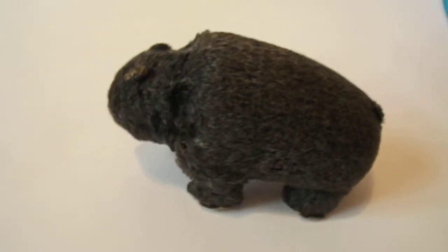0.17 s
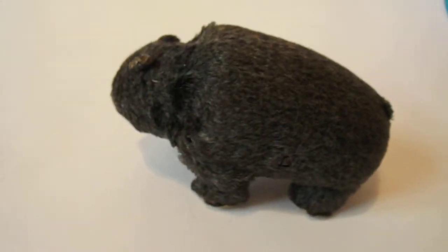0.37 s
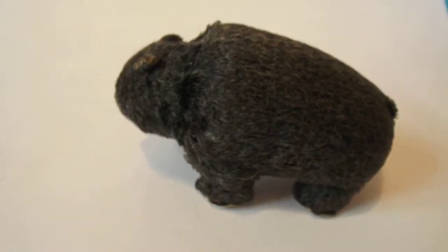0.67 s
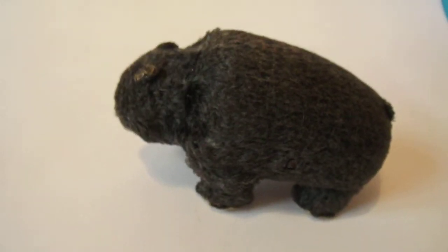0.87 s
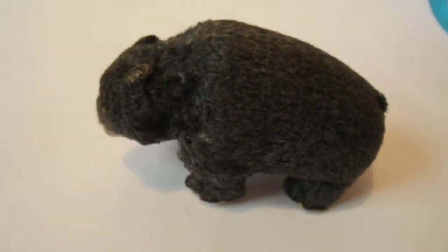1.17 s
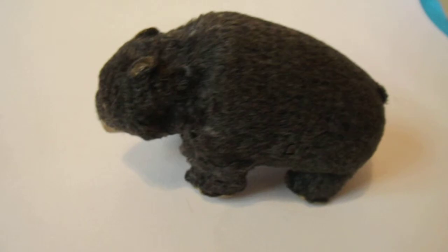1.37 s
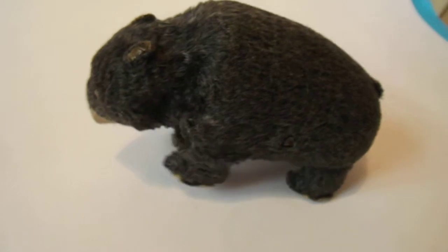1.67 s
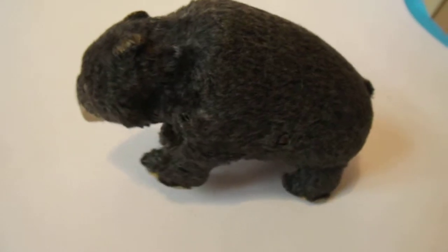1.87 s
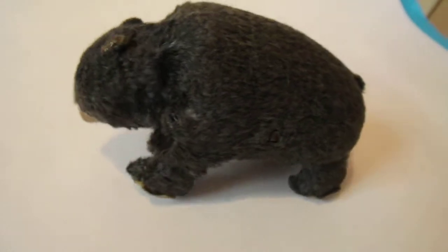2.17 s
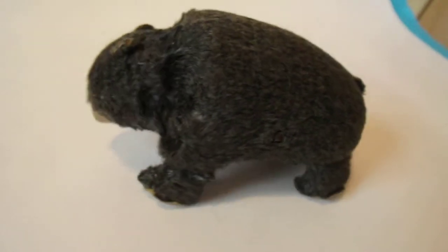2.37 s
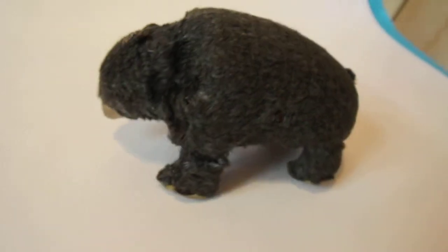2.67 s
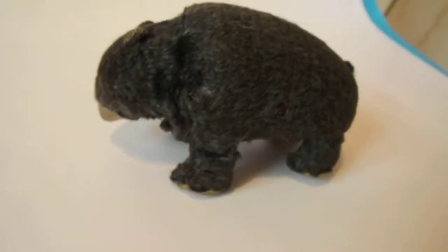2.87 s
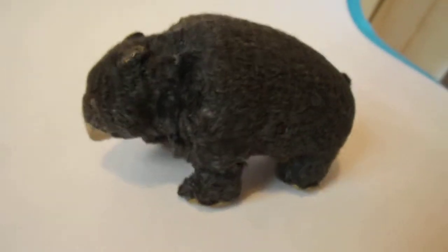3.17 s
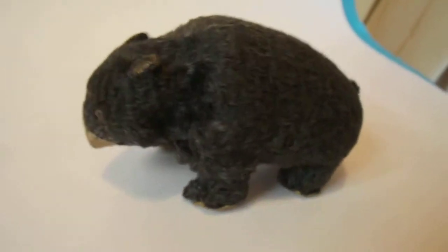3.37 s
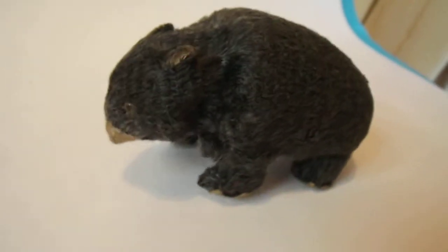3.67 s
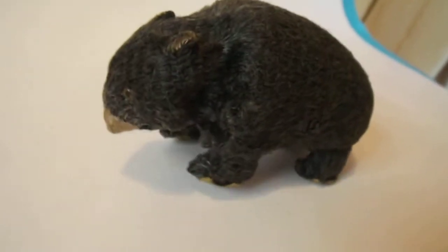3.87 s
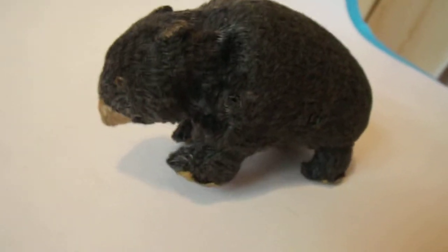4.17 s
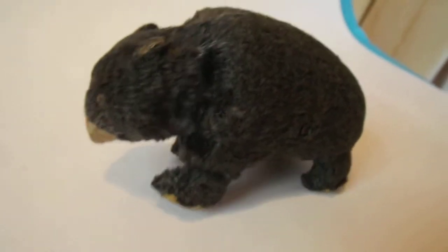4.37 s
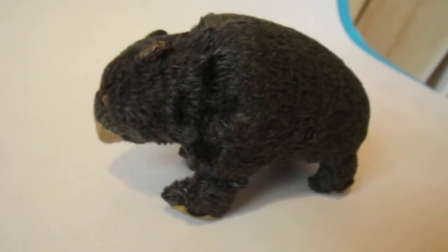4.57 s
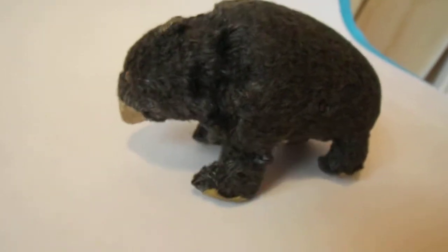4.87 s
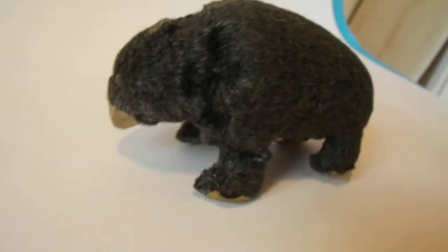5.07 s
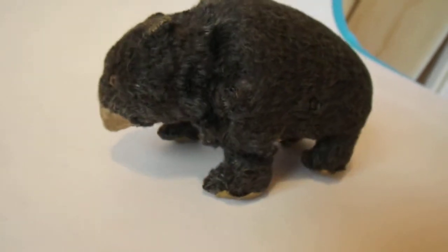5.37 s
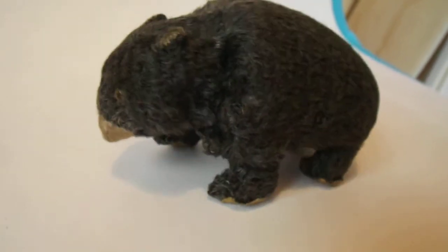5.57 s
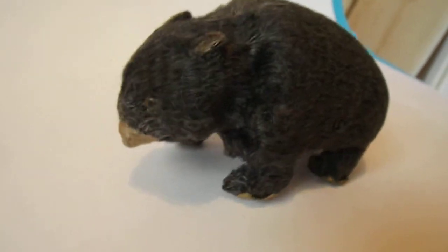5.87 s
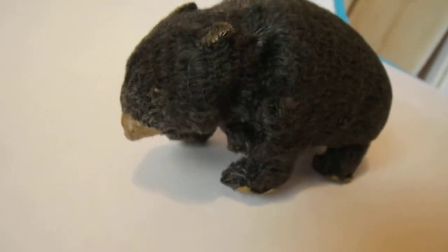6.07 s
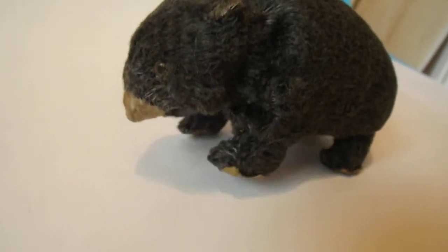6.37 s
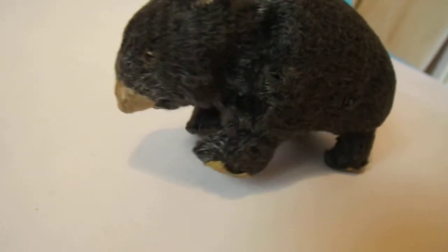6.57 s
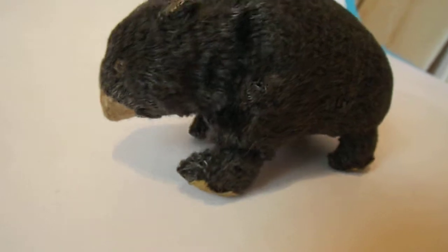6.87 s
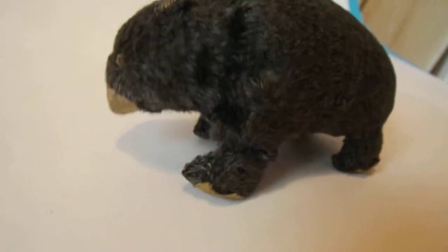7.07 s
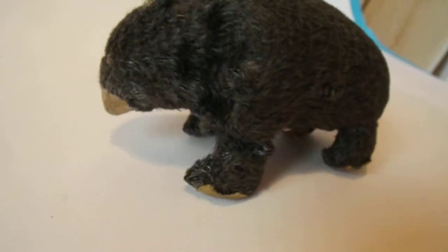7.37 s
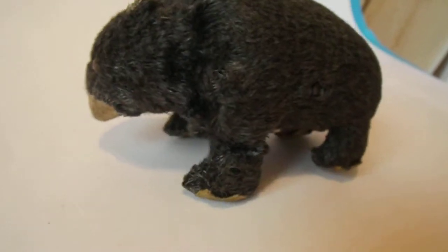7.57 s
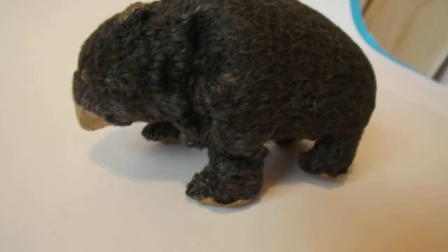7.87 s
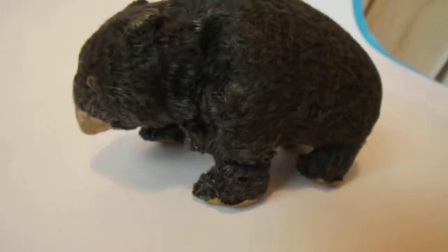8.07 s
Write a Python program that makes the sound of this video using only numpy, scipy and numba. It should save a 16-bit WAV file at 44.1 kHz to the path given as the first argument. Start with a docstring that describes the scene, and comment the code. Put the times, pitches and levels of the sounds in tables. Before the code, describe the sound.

A bright, rattling clockwork whir runs from the start for about eight seconds, close to a small microphone: a plush-covered tin bear walking on a table. Dense, tiny gear knocks ring the metal body with a high, hissy tone, wavering and gradually slowing a little. The whir sags briefly as a leg loads the mechanism at about 1.4 seconds, more deeply at 3.6 and most deeply at 5.9, recovering each time. Sharper gear ticks stand out around 0.5, 2.8, 4, 5.3, 6.9 and 7.2 seconds. The padded feet knock and scuff softly on the table at about 1.2 and 1.6 seconds, more faintly at 3.2, and barely at 5.4 and 6.8. Beneath the whir lie a very faint hum from the mechanism and the low, steady rumble of a quiet room.

```python
"""A bright, rattling clockwork whir: a plush-covered tin bear walks over a table top, close to a small
microphone. Its spring drives a gear train and a fast governor shaft: dense tooth knocks ring the
tin case, the shaft hums, and the whir sags and slows when a leg loads the train. The feet knock and
scuff softly on the table; behind them lies the low rumble of a quiet room."""
import sys
import numpy as np
from scipy import signal
from scipy.fft import rfft, irfft
from scipy.io import wavfile
from scipy.ndimage import uniform_filter1d
from numba import njit

SR = 44100
rng = np.random.default_rng(int(sys.argv[2]) if len(sys.argv) > 2 else 0)


def log_audio(samples):
    """Write samples as a 16-bit WAV file to the path given in sys.argv[1]."""
    # one column per channel
    frames = np.atleast_2d(samples).T
    # limit to full scale, then quantise
    limited = np.clip(frames, -1, 1)
    pcm = np.round(limited * 32767).astype(np.int16)
    wavfile.write(sys.argv[1], SR, pcm)


N = 363031


def clockwork():
    """The spring-driven train shakes case and table; returns the case's whir and the low hums."""
    # governor speed, slowing as the spring unwinds and whenever a leg loads it: t/s, turns/Hz
    governor = [(0.0, 145.5), (.2, 145.3), (.28, 136.8), (0.44, 132.2), (.52, 148.3), (0.62, 157.2),
                (.8, 147.6), (1.1, 145.7), (1.4, 122), (1.63, 127.7), (1.9, 125.7), (2.18, 139.4),
                (2.5, 119.6), (2.7, 129.8), (3.0, 118.8), (3.3, 132.8), (3.58, 102.4), (3.85, 127.7),
                (4.1, 121), (4.4, 137.4), (4.56, 129.1), (4.72, 110), (5.41, 114.5), (5.64, 128.4),
                (5.94, 96.5), (6.3, 122.6), (6.55, 115.8), (6.9, 132.6), (7.03, 114), (7.43, 101.4),
                (8.23, 102)]
    # whir in the plates while the train runs free: t/s, level/dB
    free_whir = [(0, -27.5), (.44, -27.5), (.5, -25), (.92, -27), (1.05, -27), (1.2, -29), (1.65, -27),
                 (1.85, -29.5), (2.2, -26), (2.42, -28.5), (2.62, -26.5), (3.3, -28.5), (4.1, -29.5),
                 (4.38, -27.5), (4.5, -27), (4.66, -30), (5.62, -28), (6.35, -28), (6.46, -30.5),
                 (6.6, -29), (6.9, -27.5), (7.05, -31), (8.23, -28.5)]
    # a leg nearly stalls the train: deepest t/s, sag/dB, sinking/s, recovering/s
    stalls = [(1.4, -6, 0.2, 0.14), (3.585, -10, 0.25, 0.23), (5.94, -14.5, 0.28, 0.3)]
    free_db, stall_db = curve(free_whir), ramps(stalls, hold_s=0.019)
    turns_hz = curve(governor)
    phase = 2 * np.pi * np.cumsum(turns_hz) / SR
    force = gear_teeth(turns_hz, phase, free_db + stall_db, stall_db)
    return tin_case(force, free_db, stall_db), table_top(force) + shaft_hum(phase)


def gear_teeth(turns_hz, phase, whir_db, stall_db):
    """Force of the gears: uneven tooth knocks over rubbing, bunched by the lopsided two-winged shaft."""
    # harder knocks in the train: t/s, level/dB (on the scale of whir_db)
    hard_knocks = [(0.4723, -13), (2.439, -18), (2.811, -11), (3.336, -21), (3.582, -22.5), (3.6297, -26),
                   (3.964, -16), (4.402, -18), (4.7388, -18), (4.9814, -18), (5.2768, -11), (5.8416, -24),
                   (6.0095, -27), (6.842, -17), (6.8884, -12.5), (6.942, -16), (7.1701, -11),
                   (7.2823, -17.5), (7.664, -21)]
    teeth_per_turn, bounce_s, smear_s = 9.7, 0.0015, 0.00024
    slip = 1.26 * walk(12)  # backlash lets the bunches run early or late
    flap = 0.088 - 0.0344 * stall_db  # a labouring train chatters in clearer bunches
    bunching = np.maximum(1 + 0.085 * np.cos(phase) + flap * np.cos(2 * phase + slip), 0)
    hits = rng.random(N) < teeth_per_turn * turns_hz / SR
    knocks = level(hits.astype(float), 0)
    for start_s, db in hard_knocks:
        i = int(start_s * SR)
        knocks[i:i + int(bounce_s * SR)] += undb(db - whir_db[i] - 0.5)
    fall = np.exp(-1 / (smear_s * SR))
    smeared = np.sqrt(signal.lfilter([1 - fall], [1, -fall], knocks ** 2))
    rubbing = 2.03 * undb(0.1 * stall_db)
    surge = undb(0.36 * walk(25) + 0.37 * walk(120))  # uneven wheels further down the train
    return (smeared + rubbing) * bunching * surge


def tin_case(force, free_db, stall_db):
    """The gear force rings each part of the case, which swells and sags by its own amount."""
    # resonances of the case, part by part: f/Hz, width/Hz, relative level/dB
    plates = [(7345, 360, -10.5), (7800, 430, -8), (8200, 450, -4.5), (8820, 670, -6.5),
              (9720, 1340, -15.5)]
    belly = [(780, 150, -3.5), (889, 80, 3), (1025, 117, 2.5)]
    chest = [(1374, 20, -0.5), (1432, 33, -2), (1470, 600, -4), (1555, 34, -2), (1667, 40, -5),
             (1915, 440, -3.5)]
    ribs = [(1093, 27, -2), (1181, 31, -2.5), (1250, 33, 3), (1304, 22, 0.5)]
    flank = [(2293, 150, -1.5), (2410, 93, 3), (2543, 117, 2)]
    frame = [(2915, 710, -10), (3470, 310, -6.5), (3973, 167, -4.5)]
    shoulders = [(4540, 310, -3), (5530, 440, -1)]
    back = [(6270, 560, 0.62), (6640, 660, 3.2)]
    rivets = [(11250, 1000, -5), (12500, 650, -4.5), (13560, 760, -6.5)]
    neck = [(4917, 290, 0), (5156, 260, 0)]
    # balance of the parts, belly to neck: base level/dB, change as the toy turns to the microphone/(dB/s),
    # share of the whir's changes, share of a stall, share of a light load, random drift/dB
    balance = [(-55, -0.44, 0.11, 0.5, 0.69, 2.5), (-49.5, -1.03, 0.56, 0.7, 1.2, 1.5),
               (-55, -0.32, 0.37, 0.69, 4.2, 1), (-51, 0.35, 0.31, 0.59, 0.1, 1.5),
               (-42, -.5, 0.67, 0.56, 0.6, 0.63), (-39, -0.46, 0.3, 0.83, 0.97, 0.9),
               (-35.5, -0.04, 0.42, 0.82, 0.086, 1.74), (-40, -0.16, 0.3, 0.7, 0.99, 0.5),
               (-40.5, -.5, 0.28, 0.99, .8, 0.6)]
    # each part rings more or less as the body flexes: fullest t/s, gain/dB, onset/s, return/s
    flexing = {"belly": [(.95, 2.5, .15, 0.13), (1.85, 4, 0.36, 0.59), (4.35, 1, 0.78, 0.19),
               (6.85, 6.5, 0.16, 0.13)], "chest": [(1.2, 5.5, 0.14, 0.13), (1.6, 3, 0.13, 0.17),
               (3.85, 3, 0.19, 0.29), (6.85, 3, 0.8, 0.22)], "ribs": [(.15, 6, 0.18, 0.2),
               (2.8, -9, 0.21, .2), (5.3, 1, 0.52, 0.43), (6.6, 2, 0.85, .35), (7.85, -1.5, .35, .4)],
               "flank": [(2.8, -4, 1.14, 0.83), (4.5, 4.5, 0.11, .15), (6.7, 4, 0.99, 0.6),
               (8.15, 3.5, 0.12, .1)], "frame": [(2.9, -2.5, .5, 0.39), (3.57, -0.5, .15, 0.12),
               (3.87, 3, 0.13, 0.11), (4.9, -1.5, 0.82, 1), (5.95, 1.5, 0.23, 0.5), (7.4, -1, 0.31, 0.5)],
               "shoulders": [(2.1, 3.5, 0.08, 0.25), (3, -0.5, 0.45, 0.27), (.1, 1.5, .2, .2),
               (3.87, 3, 0.14, 0.13), (4.6, -0.5, .5, 0.57), (6.75, 1.5, .2, 0.3), (7.95, 2.5, 0.15, 0.31)],
               "back": [(1.7, 3, 0.55, .2), (4.3, -1.5, 0.27, 0.39), (4.9, 5.5, 0.19, 0.5),
               (7.4, 5, 0.34, 0.48)], "rivets": [(1.7, 1, .2, .2), (3.9, 4, .15, .2), (6.85, 2, .2, .15)],
               "neck": [(.1, 0.5, .2, .2), (1.6, 4, .15, .15), (2.1, 4, .1, .2), (3.87, 2, .13, 0.13),
               (4.6, -1, 0.56, .5), (6.82, 6.5, 0.39, .18), (8, 0, .3, .3)]}
    # the other leg's lighter load: deepest t/s, sag/dB, sinking/s, recovering/s
    light_loads = [(.35, -1.5, .15, 0.19), (2.4, -1.5, 0.18, 0.19), (4.75, -3, 0.29, 0.34),
                   (7.2, -1.5, 0.24, 0.29)]
    t = np.arange(N) / SR
    mean_whir_db, load_db = -28.5, ramps(light_loads)
    case = ring(force, plates) * undb(free_db + stall_db)
    parts = (belly, chest, ribs, flank, frame, shoulders, back, rivets, neck)
    for modes, settings, swells in zip(parts, balance, flexing.values()):
        base_db, db_per_s, whir_share, stall_share, load_share, drift_db = settings
        running_db = base_db + db_per_s * t + whir_share * (free_db - mean_whir_db)
        sag_db = stall_share * stall_db + load_share * load_db
        case += ring(force, modes, drift_db) * undb(running_db + sag_db + ramps(swells))
    return case


def ring(force, modes, drift_db=1.12, flicker_db=0.86, common=0.54):
    """The modes of one part feel much the same blows, each with a share that shifts as the body flexes."""
    out, blows = 0, rng.standard_normal(N)
    bend = 1 + 0.0094 * walk(2.49)  # flexing also slides the resonances
    for k, (hz, width_hz, db) in enumerate(modes):
        mode_blows = np.sqrt(common) * (-1) ** k * blows + np.sqrt(1 - common) * rng.standard_normal(N)
        gain = undb(db + drift_db * walk(3.046) + flicker_db * walk(21))
        out = out + bandpass(force * mode_blows * gain, float(hz), float(width_hz), bend)
    return level(out, 0)


def feet():
    """Each footfall knocks the table top and scuffs: a burst of rubbing that dulls as it dies away."""
    # footfalls: t/s, scuff level/dB, scuff f/Hz, scuff length/s, knock level/dB
    steps = [(1.229, -43.5, 1000, 0.012, -63), (1.584, -44.5, 950, 0.015, -76),
             (3.23, -51, 360, 0.055, -57), (5.431, -62.5, 358, 0.083, -69), (6.77, -63, 420, 0.11, -72)]
    # modes of the table top under a foot: f/Hz, relative level/dB, t60/s
    board = [(250, -13, .12), (322, 5, .15), (390, 3, 0.3), (520, 3, .07), (676, -6, .05)]
    out, t = np.zeros(N), np.arange(SR // 4) / SR
    landing = np.sin(np.pi / 2 * np.minimum(t / 0.0033, 1)) ** 2  # softened by the plush sole
    for start_s, scuff_db, hz, length_s, knock_db in steps:
        dulling = 0.79 + 0.46 * np.exp(-t / (0.34 * length_s))
        rub = bandpass(rng.standard_normal(len(t)), float(hz), 1.2 * hz, dulling)
        rub = bandpass(rub, float(hz), 0.9 * hz, dulling)
        scuff = level(rub, scuff_db) * np.exp(-(t / length_s) ** 2)
        knock = 0
        for mode_hz, mode_db, t60 in board:
            tone = np.sin(2 * np.pi * mode_hz * t * rng.normal(1, 0.037))
            knock = knock + tone * undb(knock_db + mode_db - 60 * t / t60)
        i = int(start_s * SR)
        out[i:i + len(t)] += (scuff + knock) * landing
    return out


def shaft_hum(phase):
    """The unbalanced shaft hums, one cycle a turn: always faint, clearer in soft-edged stretches."""
    # stretches where the hum carries: start t/s, length/s, level/dB
    stretches = [(0, 0.21, -68), (.22, .16, -75), (0.37, 0.23, -73), (0.595, 0.16, -73), (0.747, 0.37, -70),
                 (1.19, 0.07, -73), (1.578, 0.89, -77.5), (2.52, 0.26, -78), (2.845, .3, -84),
                 (3.2, 0.21, -74), (3.83, 0.26, -76), (4.27, 0.34, -76), (4.801, 0.53, -90),
                 (5.5, .22, -84), (6.25, 0.33, -87), (6.7, 0.28, -80)]
    # overtones of the hum: multiple of the turn rate, level against the fundamental/dB
    orders = [(2., -13.5), (3., -12.5)]
    floor_db, edge_s = -93, 0.06
    t = np.arange(N) / SR
    overtones = sum(undb(db + 3.6 * walk(6)) * np.sin(k * phase) for k, db in orders)
    gain = undb(floor_db)
    for start_s, length_s, db in stretches:
        inside_s = np.minimum(t - start_s, start_s + length_s - t)
        gain = gain + undb(db) * np.clip(inside_s / edge_s + 0.5, 0, 1)
    return np.sqrt(2) * (np.sin(phase) + overtones) * gain * undb(1.5 * walk(6.9))


def table_top(force):
    """The gear force sets the table droning faintly under the toy."""
    # resonances of the table: f/Hz, width/Hz, relative level/dB
    modes = [(214.4, 15, 3), (393, 63, -6.5)]
    # strength of the drone: t/s, level/dB
    drone = [(0, -85), (2.8, -77.5), (3.2, -70), (4.2, -90), (4.6, -73.5), (6, -76), (8.23, -77.5)]
    return ring(force, modes) * undb(curve(drone))


def echoes(x, db, shortest_s=0.0025, longest_s=0.016, count=16):
    """Paths off table, legs and wall waver as the toy moves; returns them and the rms gain with x added."""
    lags = (SR * (shortest_s + (longest_s - shortest_s) * rng.random(count))).astype(int)
    gains = np.array([walk(4.5) for _ in lags]) * undb(db) / np.sqrt(count)
    paths = sum(gain * np.roll(x, lag) for gain, lag in zip(gains, lags))
    return paths, np.sqrt(1 + (gains ** 2).sum(axis=0))


def room():
    """Low steady rumble of the house, well behind the toy."""
    # spectrum of the rumble: f/Hz, relative level/dB
    spectrum = [(15, -52), (25, -18), (54, -12), (102, -6.5), (156, -10.5), (210, -5), (472, -7),
                (637, -1.5), (900, -10.5), (1170, -30), (1980, -120)]
    hz = np.maximum(np.arange(N // 2 + 1) * SR / N, 1)
    points_hz, points_db = np.transpose(spectrum)
    colour = undb(np.interp(np.log(hz), np.log(points_hz), points_db))
    return level(irfft(rfft(rng.standard_normal(N)) * colour, N), db=-71)


def undb(db):
    """Gain of a dB value."""
    return 10 ** (np.asarray(db) / 20)


def level(x, db):
    """Scale to an rms level."""
    return x * undb(db) / np.sqrt(np.mean(x ** 2))


def curve(points):
    """Straight lines through (t/s, value) points, sample by sample."""
    return np.interp(np.arange(N) / SR, *np.transpose(points))


def ramps(rows, hold_s=0):
    """Summed dips and swells in dB with straight slopes, each held hold_s either side of its time."""
    t = np.arange(N) / SR
    return sum(np.interp(t, [s - onset_s, s - hold_s, s + hold_s, s + return_s], [0, db, db, 0])
               for s, db, onset_s, return_s in rows)


def walk(rate_hz):
    """Random values held 1 / rate_hz seconds and smoothed twice; spread near 1."""
    hold = int(SR / rate_hz)
    held = np.repeat(rng.standard_normal(N // hold + 1), hold)
    return np.sqrt(2) * uniform_filter1d(uniform_filter1d(held, hold), hold)[:N]


@njit
def bandpass(x, hz, width_hz, bend):
    """State-variable band-pass, gain 1 at the centre; bend scales the centre sample by sample."""
    y, band_state, low_state = np.empty(len(x)), 0., 0.
    centre, damping = np.tan(np.pi * hz / SR), width_hz / hz
    for i in range(len(x)):
        g = centre * bend[i]
        band = (band_state + g * (x[i] - low_state)) / (1 + g * (g + damping))
        band_state = 2 * band - band_state
        low_state += 2 * g * band
        y[i] = damping * band
    return y


def scene():
    """The toy close up in its room; a faint, wavering left-right difference gives the whir some width."""
    case, hums = clockwork()
    reflections, total_gain = echoes(case, db=-9.5)
    side, _ = echoes(case, db=-19.0)
    mid = (case + reflections) / total_gain + hums + feet() + room()
    return mid + side * np.array([[1], [-1]])


def record(dry):
    """Left lags right by a sample; below about 3.9 kHz both sides sound alike, above it the treble spreads
    wide; a thin notch, a dull top."""
    stereo_above_hz, dull_hz, cutoff_hz = 3910, 14700, 15770
    notch_hz, notch_width_hz = 7000, 70
    hz = np.arange(N // 2 + 1) * SR / N
    left, right = rfft(dry) * np.exp(1j * np.pi * hz / SR * np.array([[-1], [1]]))
    width = 0.0071 + 1 / (1 + (stereo_above_hz / np.maximum(hz, 1)) ** 20.0)
    mid, side = (left + right) / 2, (left - right) / 2 * width
    dulled = irfft((mid + side * np.array([[1], [-1]])) / (1 + (hz / dull_hz) ** 8), N)
    notched = signal.lfilter(*signal.iirnotch(notch_hz, notch_hz / notch_width_hz, SR), dulled)
    return signal.sosfilt(signal.ellip(14, 0.2, 60, cutoff_hz, fs=SR, output="sos"), notched)


dry = scene()
out = record(dry)
log_audio(out)
```